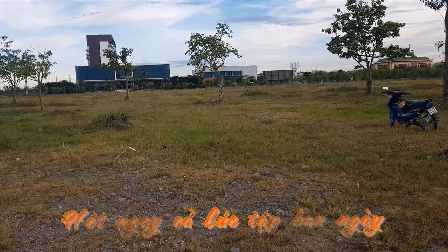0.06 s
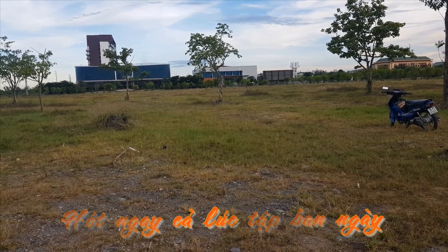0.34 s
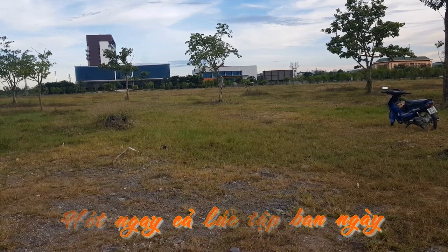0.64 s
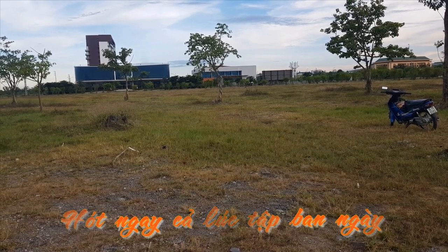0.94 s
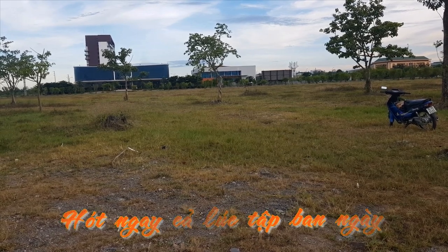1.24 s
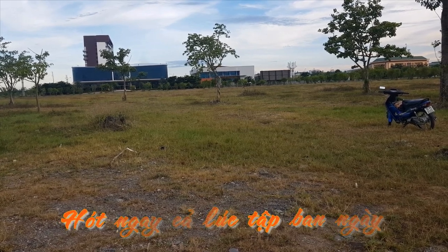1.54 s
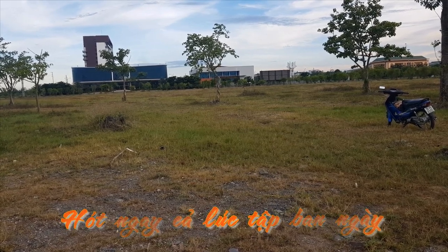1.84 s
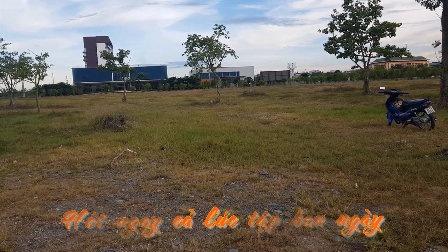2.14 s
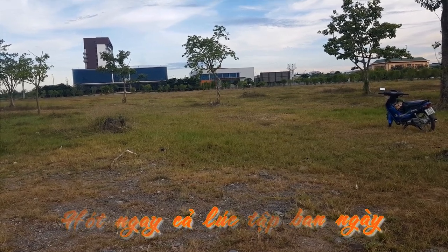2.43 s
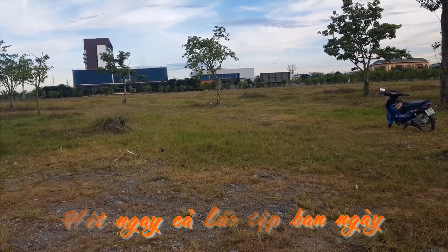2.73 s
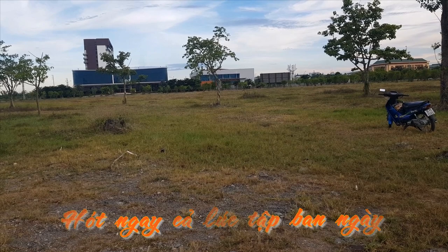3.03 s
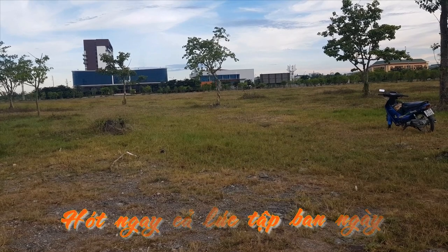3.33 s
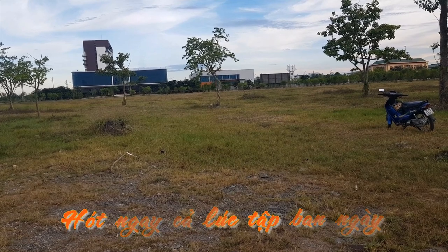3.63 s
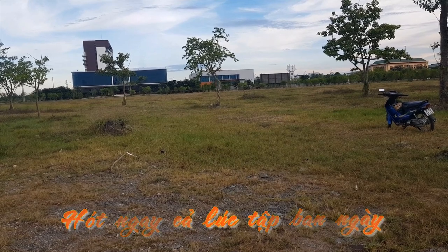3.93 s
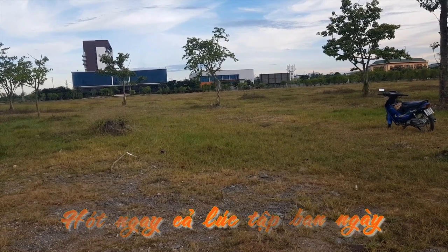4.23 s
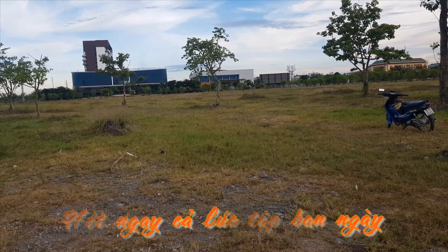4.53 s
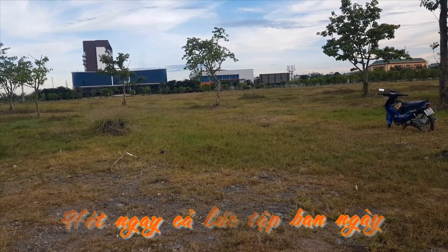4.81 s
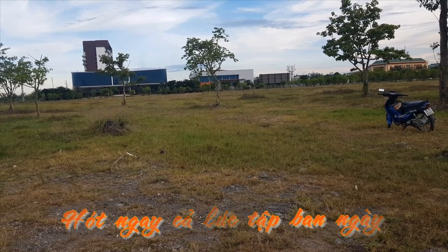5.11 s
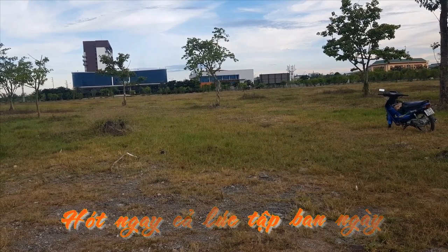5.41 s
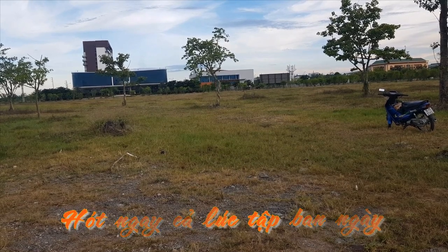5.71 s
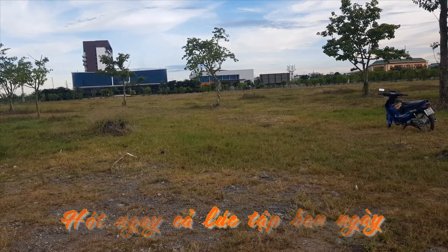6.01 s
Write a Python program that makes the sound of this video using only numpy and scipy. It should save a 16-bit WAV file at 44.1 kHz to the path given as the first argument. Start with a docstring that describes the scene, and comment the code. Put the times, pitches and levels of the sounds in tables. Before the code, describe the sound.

A bird of prey cries twice near a stereo microphone in an open field. At first there is only a soft rumble of far traffic, with thin bird chips and barely audible toots. Then come two loud, piercing screams, each leaping up, rasping and breaking into a falling whine, with very little echo. The second is slightly longer, and the rumble is fainter afterwards.

```python
"""An open field, where a goshawk screams twice close to a stereo microphone. The two sides of its
syrinx act as coupled oscillators: each call rises with them locked an octave apart, splits into two
rasping voices, then breaks into a clean falling whine. Far traffic, a throbbing engine, thin bird chips
and faint two-pitch toots, perhaps a vehicle horn, lie behind; trees and ground return a weak echo.
The first scream turns the automatic gain down."""
import sys
import numpy as np
from scipy import signal
from scipy.fft import rfft, irfft, next_fast_len
from scipy.io import wavfile
from scipy.ndimage import uniform_filter1d, map_coordinates

SR = 44100
rng = np.random.default_rng(int(sys.argv[2]) if len(sys.argv) > 2 else 0)


def dump_mix(stems):
    """Bounce the given channels to the path in sys.argv[1] as a 16-bit WAV at rate SR."""
    frames = np.atleast_2d(stems).T  # one column per channel
    limited = np.clip(frames, -1, 1)  # hard clip at full scale
    pcm = np.round(limited * 32767).astype(np.int16)
    wavfile.write(sys.argv[1], SR, pcm)


N = 267246


def amp(db):
    """Amplitude ratio of a level in decibels."""
    return 10 ** (np.asarray(db) / 20)


def unit(x):
    """Normalisation to an rms of 1."""
    return x / np.sqrt(np.mean(x ** 2) + 1e-20)


def along(points, hz):
    """Interpolation of (frequency_hz, value) points on a logarithmic frequency axis."""
    f, v = np.transpose(points)
    return np.interp(np.log(hz + 1), np.log(f + 1), v)


def curves(rows, t):
    """Linear interpolation in time of each column after the first."""
    times, *columns = np.transpose(rows)
    return [np.interp(t, times, column) for column in columns]


def wobble(rate_hz, t):
    """Slow random modulation: a curve through rate_hz Gaussian values a second."""
    knots = (t - t[0]) * rate_hz
    coarse = knots[::8]
    return np.interp(knots, coarse, map_coordinates(rng.standard_normal(int(knots[-1]) + 4), [coarse]))


def angle(hz):
    """Phase as the time integral of frequency."""
    return 2 * np.pi * np.cumsum(hz) / SR


def filtered(x, response):
    """Linear filtering: the spectrum is multiplied by a frequency response."""
    n = x.shape[-1]
    m = next_fast_len(n + SR // 10, True)
    return irfft(rfft(x, m) * response(np.fft.rfftfreq(m, 1 / SR)), m)[..., :n]


def stereo_noise(spectrum):
    """Partially coherent noise of rms 1: the channels are most alike at long wavelengths."""
    # likeness of left and right: frequency_hz, correlation
    coherence = [(40, .88), (150, .9), (300, 0.93), (600, .45), (1200, 0.83), (4000, 0.2), (12000, .3)]
    def response(hz):
        turn = np.arccos(np.clip(along(coherence, hz), -1, 1)) / 2
        return amp(along(spectrum, hz)) * [np.cos(turn), np.sin(turn)]
    mid, side = filtered(rng.standard_normal((2, N)), response)
    return unit(np.array([mid + side, mid - side]))


def microphone_hiss(level_db=-69.5):
    """Self-noise of the microphone: a steady floor in the high treble."""
    # noise density: frequency_hz, relative_db
    spectrum = [(3000, -31.5), (7000, -17), (9000, -11), (11000, -2), (13000, -0.5), (16000, -3.5)]
    return amp(level_db) * stereo_noise(spectrum)


def traffic(throb_depth=.3, left_db=0.43):
    """Far broadband noise; one engine adds harmonics of its firing rate and modulates the road noise."""
    # drifting traffic levels: time_s, rumble_db, road_db
    levels = [(0, -41, -63), (.25, -41.5, -63), (.35, -47, -65), (.62, -41, -64), (.95, -42.5, -63.5),
              (1.2, -40, -61), (1.6, -41.5, -65), (2, -40, -59.5), (2.4, -41.5, -63.5),
              (2.85, -40.5, -59.5), (3.4, -41, -63.5), (6.06, -42.5, -65)]
    # noise densities of rumble and road: frequency_hz, relative_db
    rumble_spectrum = [(20, -27), (30, -15), (42, 3.5), (65, -0.5), (85, -3), (117, -1), (155, -6),
                       (250, -17.5), (370, -25), (490, -27.5), (700, -47.5), (1500, -100)]
    road_spectrum = [(300, -28.5), (550, -7), (720, -11.5), (950, 2), (1250, 2.5), (1500, -8.5), (2000, -9),
                     (3000, -12.5), (4000, -15.5), (5000, -21.5), (7000, -27.5), (10000, -44.5)]
    # engine speed: time_s, firing_hz
    engine_speed = [(0, 35.39), (1.6, 36.99), (2, 39.51), (6.06, 38.49)]
    # engine harmonics: order, relative_db
    orders = [(1, -11), (2, -7), (4, -13), (5, -22), (6, -23.5)]
    t = np.arange(N) / SR
    rumble_db, road_db = curves(levels, t)
    firing_hz, = curves(engine_speed, t)
    firing = angle(firing_hz * (1 + 0.016 * wobble(16, t)))
    drone = np.zeros(N)
    for order, db in orders:
        size = np.sqrt(2) * amp(db + 2.5 * wobble(11, t))
        drone += size * np.sin(round(order) * firing + rng.uniform(0, 2 * np.pi))
    rumble = amp(-2 + 1.4 * wobble(5.8, t)) * stereo_noise(rumble_spectrum)
    road = amp(.9 * wobble(20, t)) * (1 + throb_depth * np.cos(firing)) * stereo_noise(road_spectrum)
    balance = amp([[left_db / 2], [-left_db / 2]])
    return (amp(rumble_db) * (rumble + drone) + amp(road_db) * road) * balance


def far_sounds(chip_hz=5050, chip_width_hz=580, toot_s=.12, toot_width_hz=90,
               rustle_s=.26, rustle_width_hz=850):
    """Narrow-band noise bursts: short notes and rustles, blurred by distance."""
    # thin chips of small birds: start_s, length_s, level_db
    chips = [(.03, .18, -79), (.65, .08, -81), (0.941, 0.032, -68.5), (1.427, 0.046, -68.5),
             (1.49, .07, -75), (2.053, .16, -72.5)]
    # an insect-like buzz: start_s, length_s, centre_hz, width_hz, level_db
    buzzes = [(1.296, .18, 8000, 750, -71.5)]
    # faint far toots on two pitches, perhaps a vehicle horn: start_s, centre_hz, level_db
    toots = [(1.95, 2382, -70), (2.06, 3166, -63), (2.46, 3122, -67.5), (2.48, 2330, -70),
             (2.607, 3091, -63.5), (2.62, 2330, -73)]
    # soft rustles: start_s, centre_hz, level_db
    rustles = [(.52, 2390, -70), (.97, 2180, -68.5), (2.72, 3000, -69)]
    notes = [(s, length, chip_hz, chip_width_hz, db) for s, length, db in chips] + buzzes
    notes += [(s, toot_s, hz, toot_width_hz, db) for s, hz, db in toots]
    notes += [(s, rustle_s, hz, rustle_width_hz, db) for s, hz, db in rustles]
    out = np.zeros((2, N))
    for start_s, length_s, centre_hz, width_hz, db in notes:
        first, n = int(start_s * SR), int(length_s * SR)
        band = lambda hz: np.exp(-2 * ((hz - centre_hz) / width_hz) ** 2)
        note = filtered(rng.standard_normal((2, n)), band)
        out[:, first:first + n] += amp(db) * unit(note + note.mean(0)) * np.sin(np.pi * np.arange(n) / n)
    return out


def field_echo(x):
    """Scattering from trees and ground: convolution with an exponentially decaying noise tail."""
    # reverberation time: frequency_hz, t60_s
    decay = [(1000, .7), (3500, 0.67), (6000, 0.87), (14000, .2)]
    hz, t, spectra = signal.stft(rng.standard_normal((2, SR)), SR, nperseg=256)
    tail = signal.istft(spectra * amp(-60 * t / along(decay, hz)[:, None]), SR, nperseg=256)[1]
    return signal.fftconvolve(x, tail / np.linalg.norm(tail[0]), axes=1)[:, :N]


def rasp(free, high_hz, air_db, ring_db, ring_hz=4050, width_hz=130, capture_hz=220):
    """Turbulence: air sputters in the throat, and a narrow resonance rings while the voices run free."""
    # density of the air noise: frequency_hz, relative_db
    spectrum = [(500, -32), (950, -30.5), (1600, -22), (2300, -13), (2900, -15), (3450, -3), (3850, -3),
                (4400, -13), (5000, -17.5), (6000, -18.5), (7600, -16), (9500, -31.5), (11500, -26.5),
                (13200, -28), (14500, -34), (16000, -35.5)]
    t = np.arange(len(free)) / SR
    sputter = amp(wobble(250, t))
    air = unit(sputter * filtered(rng.standard_normal(len(t)), lambda hz: amp(along(spectrum, hz))))
    resonance = lambda hz: 1 / (1 + ((hz - ring_hz) / width_hz) ** 2)
    ring = unit(filtered(rng.standard_normal(len(t)), resonance))
    apart = np.clip(np.abs(high_hz - ring_hz) / capture_hz, .3, 1)  # weaker with the high voice on it
    return amp(air_db) * air + amp(ring_db) * free * apart * ring


def subharmonics(t, high_phase, shimmer_db=3.5):
    """Period tripling or quadrupling puts weak, unsteady lines between the harmonics."""
    # spans of lengthened period: start_s, end_s, high_voice_cycles, level_db
    spans = [(3.22, 3.413, 4, -41.5), (4.63, 4.806, 3, -30.5), (4.926, 5.105, 4, -46.5)]
    out = np.zeros(len(t))
    for start_s, end_s, cycles, db in spans:
        now, n = (t > start_s) & (t < end_s), round(cycles)
        lines = sum(k / n * np.sin(k * high_phase[now] / n) for k in range(1, 2 * n) if 2 * k % n)
        out[now] += amp(db) * signal.windows.tukey(now.sum()) * lines
    return out * amp(shimmer_db * wobble(90, t))


def membrane(t, hz, db, rasp_db, flutter, flutter_hz, tremor_db=0.35):
    """Phase and amplitude of one voice: random modulation deepens as it sinks toward the rasp."""
    depth = flutter * np.minimum(amp(rasp_db - db), 1)
    size = np.sqrt(2) * amp(db + tremor_db * wobble(70, t)) * (1 + .5 * depth * wobble(flutter_hz, t))
    return angle(hz) + depth * wobble(flutter_hz, t), size


def syrinx(t, controls, overtones, low_flutter, high_flutter, sideband_db, air_db, ring_db,
           jitter=0.0015, waver_db=2.5, unlocked_db=-6):
    """Coupled oscillators: two voices lock at the octave or pull free, and make combination tones."""
    low_hz, low_db, high_hz, high_db, rasp_db, bright_db = controls
    # entrainment: close to the octave the high voice drags the low one into step
    mistuning = np.abs(high_hz / (2 * low_hz) - 1)
    free = np.clip((mistuning - .015) / .03, 0, 1)
    low_hz = high_hz / 2 + free * (low_hz - high_hz / 2)
    tension = 1 + jitter * wobble(120, t)
    low, low_size = membrane(t, low_hz * tension, low_db, rasp_db, low_flutter, flutter_hz=330)
    high, high_size = membrane(t, high_hz * tension, high_db, rasp_db, high_flutter, flutter_hz=700)
    voice = low_size * np.sin(low) + high_size * np.sin(high) + subharmonics(t, high)
    for of_low, of_high, db in overtones:
        parent_size = low_size * amp(free * unlocked_db) if round(of_low) else high_size
        size = amp(db + bright_db + waver_db * wobble(30, t)) * parent_size
        voice += size * np.sin(round(of_low) * low + round(of_high) * high)
    # when free, the low voice is mirrored above the high one
    voice += amp(sideband_db) * free * low_size * np.sin(2 * high - low)
    return voice + amp(rasp_db) * rasp(free, high_hz, air_db, ring_db)


def yelp(t, level_db, swell_db_per_s, rasp_db, from_hz=1310, to_hz=2046, attack_s=0.0092,
         low_db=-6, bright_db=1.5):
    """Syrinx controls for a mode-locked glide: both voices climb an octave apart and swell."""
    age = t - t[0]
    hz = np.linspace(from_hz, to_hz, len(t))
    db = level_db + swell_db_per_s * age + 20 * np.log10(np.clip(age / attack_s, .01, 1))
    return np.array([hz, db + low_db, 2 * hz, db, db + rasp_db, np.full(len(t), bright_db)])


def scream(t, contour, from_hz, to_hz):
    """Syrinx controls for biphonation: the high voice arches and falls, the low one drifts on its own."""
    high_hz, high_db, low_db, rasp_db = curves(contour, t)
    low_hz = np.linspace(from_hz, to_hz, len(t))
    return np.array([low_hz, low_db, high_hz, high_db, rasp_db, np.zeros(len(t))])


def whine(t, end_s, pitch_hz, low_db, high_db, high_fade_db_per_s, trail_s):
    """Syrinx controls for relocking: the voices crack into step, sag and collapse as air runs out."""
    crack_hz, crack_s, crack_db = 520, .011, -16.5
    sag_hz_per_s, low_fade_db_per_s, brighten_db_per_s = 1470, 47.5, 11
    collapse_hz, collapse_s, release_db, release_s = 340.6, .029, 24, .019
    age = t - t[0]
    before_end, after_end = np.minimum(t - end_s, 0), np.maximum(t - end_s, 0)
    crack = np.maximum(1 - age / crack_s, 0)
    release = np.exp(before_end / release_s) + after_end / trail_s
    hz = pitch_hz + crack_hz * crack - sag_hz_per_s * age - collapse_hz * np.exp(before_end / collapse_s)
    shape_db = crack_db * crack - release_db * release + .5 * wobble(25, t)
    # the rasp bursts at the break, then stays far below the low voice
    rasp_db = low_db - 28.5 + 14 * np.exp(-age / crack_s) - release_db * release / 2
    # the tone grows reedier, but its overtones dip at the break and die first
    bright_db = -1.5 + brighten_db_per_s * age - 10.5 * (crack + release)
    low_db = low_db - low_fade_db_per_s * age + shape_db
    high_db = high_db - high_fade_db_per_s * age + shape_db
    return np.array([hz, low_db, 2 * hz, high_db, rasp_db, bright_db])


def call(index, trail_s=.014):
    """One unbroken cry passes through three regimes of oscillation: yelp, scream, whine."""
    # opening of each call: start_s, level_db, swell_db_per_s, rasp_relative_db
    yelps = [(2.93, -10, 75, -10.5), (4.505, -18.5, 223, -10.5)]
    # one contour for each scream: time_s, high_hz, high_db, low_db, rasp_db
    contours = [
        [(2.986, 3501, -2.5, -15.5, -10.5), (3.037, 3970, 0.5, -21.5, -9.5), (3.044, 4074, 2, -20.5, -10),
         (3.086, 4045, 5, -23.5, -9.5), (3.09, 3750, .5, -20, -9.5), (3.135, 3508, 1, -18, -16.5),
         (3.17, 3330, -4.5, -16, -15.5), (3.205, 2926, -8, -25, -18.5), (3.215, 2720, -20.5, -17.5, -20.5)],
        [(4.554, 4168, -5, -18.5, -16.5), (4.6, 4225, -2, -17, -20), (4.68, 4163, -2, -25, -21.5),
         (4.8, 4037, -5, -31, -21), (4.843, 4002, -7.5, -31.5, -20), (4.85, 3580, -9.5, -32.5, -23.5),
         (4.9, 3281, -14, -28.5, -26.5), (4.935, 2960, -18.5, -43, -32), (4.95, 2711, -40.5, -34, -38.5)],
    ]
    # scream voicing: low_from_hz, low_to_hz, low_flutter, high_flutter, sideband_db, air_db, ring_db
    voicings = [(2540, 2390, 0.7, 1.0, -1, -6, -2.5), (2063, 2370, .83, .33, -12, -2, -2)]
    # close of each call: end_s, pitch_hz, low_db, high_db, high_fade_db_per_s
    whines = [(3.454, 1914, -4.5, 1.5, 40), (5.185, 1891, -11.5, -15, 7)]
    # harmonics and sum tones: low_multiple, high_multiple, first_call_db, second_call_db
    partials = [(1, 1, -2.5, -7.5), (0, 2, -19.5, -26), (1, 2, -17.5, -34.5), (0, 3, -31, -29),
                (1, 3, -21, -35), (0, 4, -48.5, -44.5)]
    start_s, *opening = yelps[index]
    contour, ending = contours[index], whines[index]
    from_hz, to_hz, *texture = voicings[index]
    first, last = int(start_s * SR), int((ending[0] + trail_s) * SR)
    t = np.arange(first, last) / SR
    rising, screaming, falling = np.split(t, np.searchsorted(t, [contour[0][0], contour[-1][0]]))
    controls = np.hstack([yelp(rising, *opening), scream(screaming, contour, from_hz, to_hz),
                          whine(falling, *ending, trail_s)])
    overtones = [(of_low, of_high, dbs[index]) for of_low, of_high, *dbs in partials]
    cry = syrinx(t, uniform_filter1d(controls, size=90), overtones, *texture)
    return np.pad(cry, (first, N - last))


def hawk(lead_s=0.4712e-3):
    """Source and filter: throat and beak colour both calls, which reach the left microphone port first."""
    # response of throat and beak: frequency_hz, gain_db
    throat = [(1000, -5.5), (1450, -4), (1900, -1), (4200, -0.5), (5700, -3.5), (6500, 0), (8200, -3),
              (9000, -14.5), (10400, -18), (11500, -4.5), (12700, 0.5), (14000, -5), (16000, -2)]
    # shadow of the housing on the two ports: frequency_hz, left_minus_right_db, extra_left_lead_rad
    shadow = [(980, -1.5, -.2), (1400, -5, .3), (1850, 1.5, .5), (2200, 2.5, 0.48), (2580, 3.5, 0.71),
              (3045, 7, -0.8), (3100, -0.5, -1.57), (3350, -1.5, -.45), (3730, -4, 0), (4257, 1.5, .35),
              (5170, 5, -0.21), (6102, -2.5, -.2), (6740, 1.5, 1), (8000, 6.5, -0.012), (12500, 5, -1.6)]
    shadow = np.array(shadow)
    ports = np.array([[.5], [-.5]])
    def path(hz):
        gain_db = along(throat, hz) + ports * along(shadow[:, :2], hz)
        lead_rad = 2 * np.pi * hz * lead_s + along(shadow[:, ::2], hz)
        return amp(gain_db) * np.exp(1j * ports * lead_rad)
    return filtered(call(index=0) + call(index=1), path)


def scene():
    """Superposition of the hawk, its echo, the far background and the hiss."""
    bird = hawk()
    return bird + amp(-43.5) * field_echo(bird) + traffic() + far_sounds() + microphone_hiss()


def record(dry, ceiling_db=-9.5, release_db_per_s=1.84, top_hz=15780):
    """Automatic gain control: the gain drops at once on a loud sound and creeps back; then a low-pass."""
    power = np.abs(uniform_filter1d(np.mean(dry ** 2, axis=0), size=180))
    excess_db = np.maximum(10 * np.log10(power + 1e-12) - ceiling_db, 0)
    recovery_db = release_db_per_s * np.arange(N) / SR
    cut_db = uniform_filter1d(np.maximum.accumulate(excess_db + recovery_db) - recovery_db, size=90)
    return filtered(dry * amp(-cut_db), lambda hz: hz < top_hz)


dry = scene()
out = record(dry)
dump_mix(out)
```